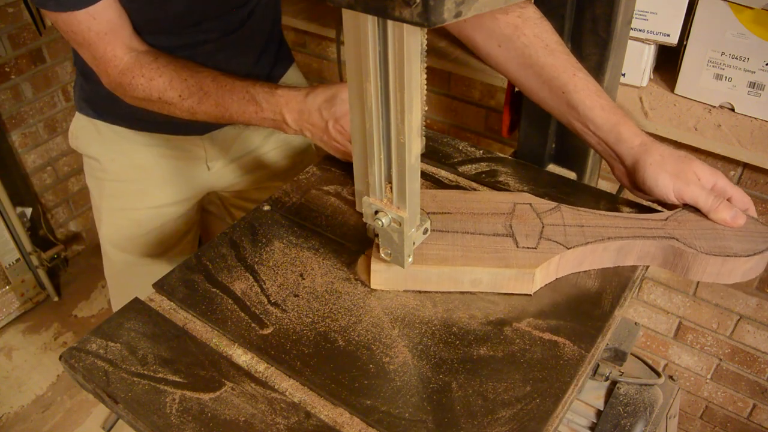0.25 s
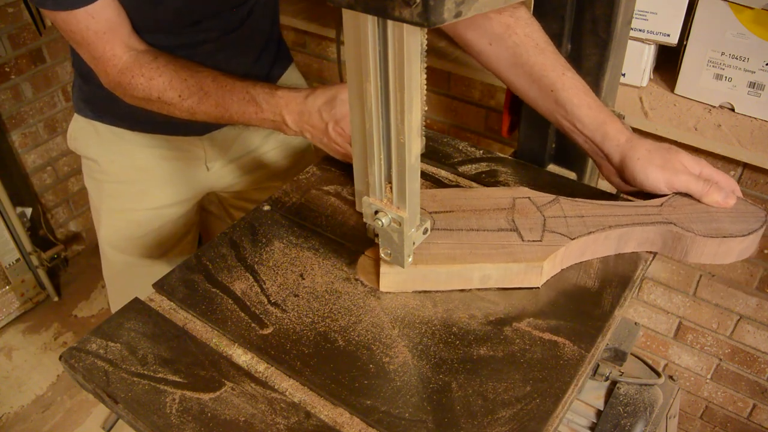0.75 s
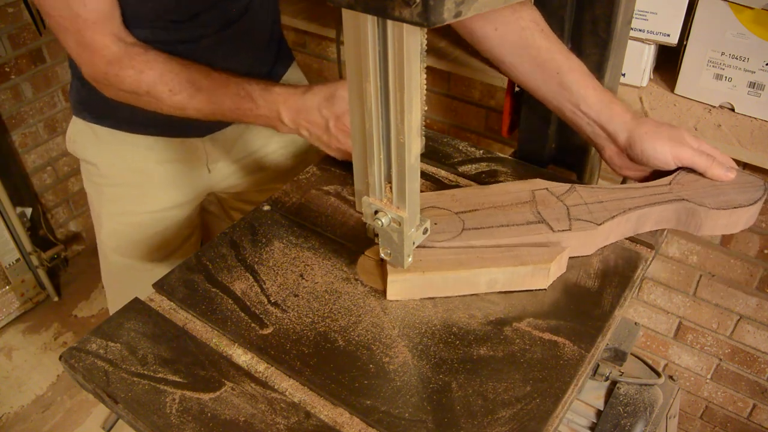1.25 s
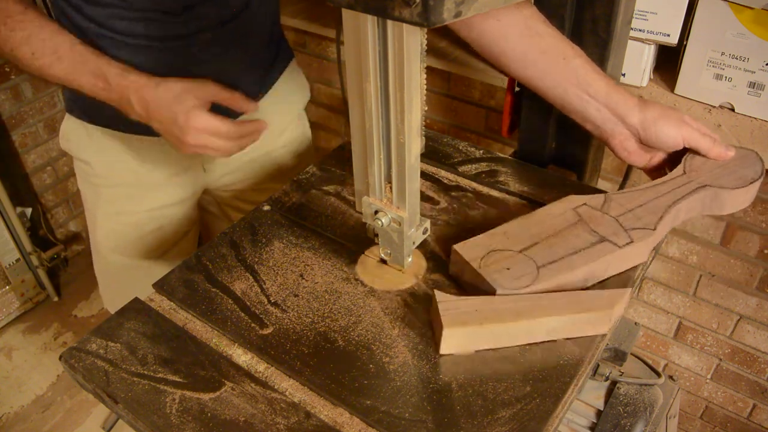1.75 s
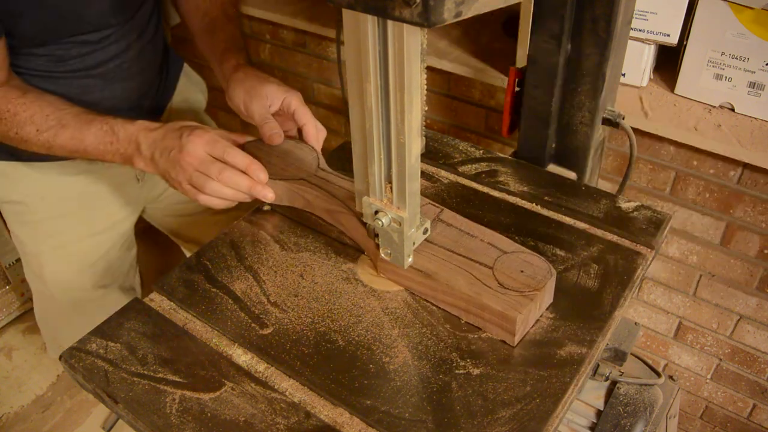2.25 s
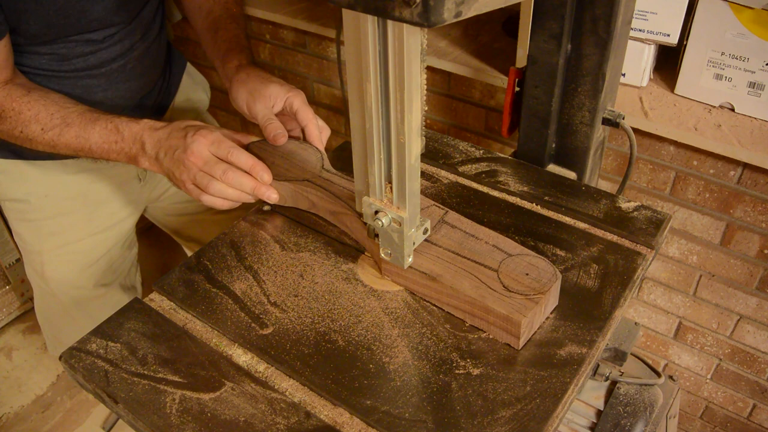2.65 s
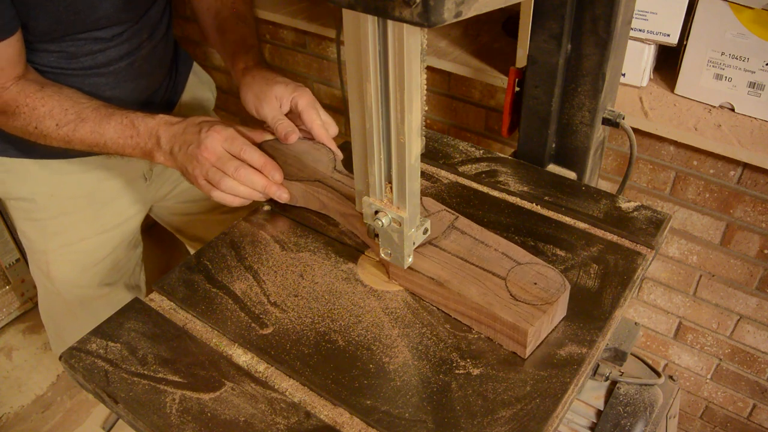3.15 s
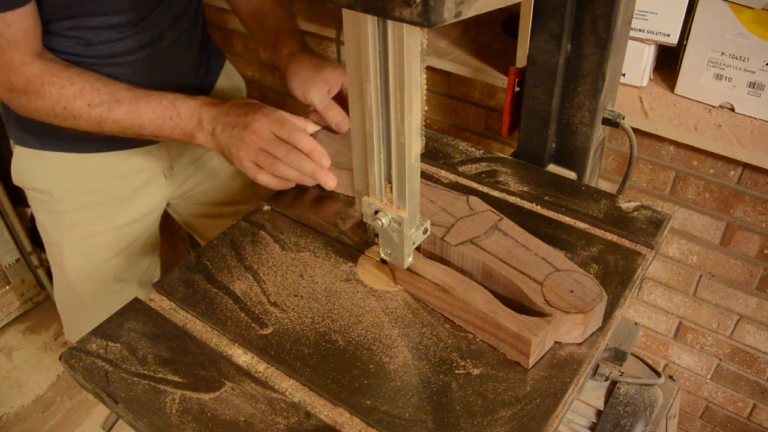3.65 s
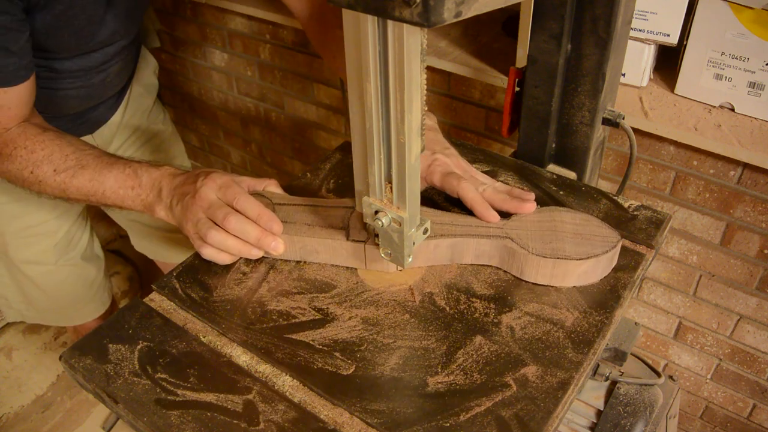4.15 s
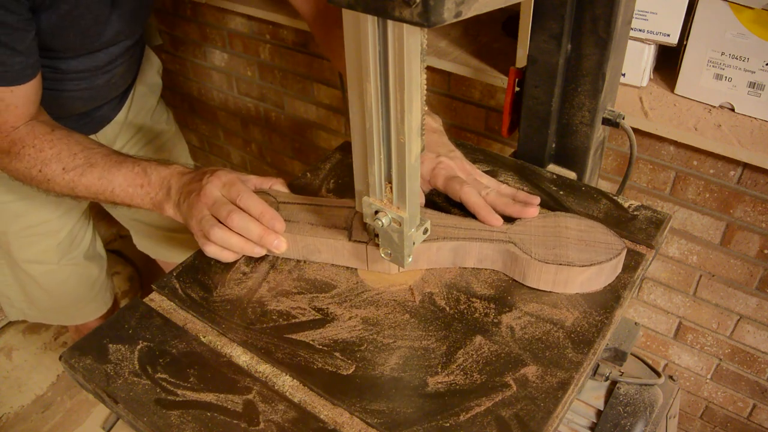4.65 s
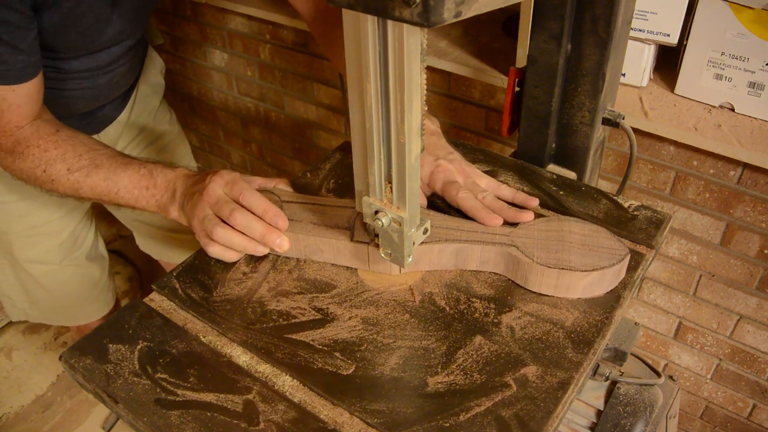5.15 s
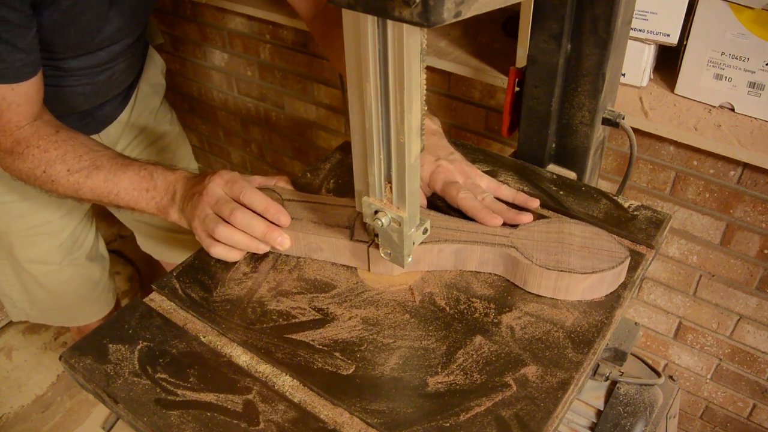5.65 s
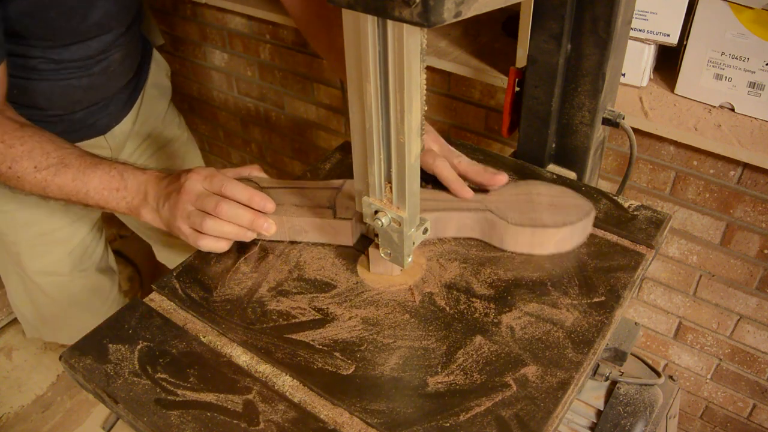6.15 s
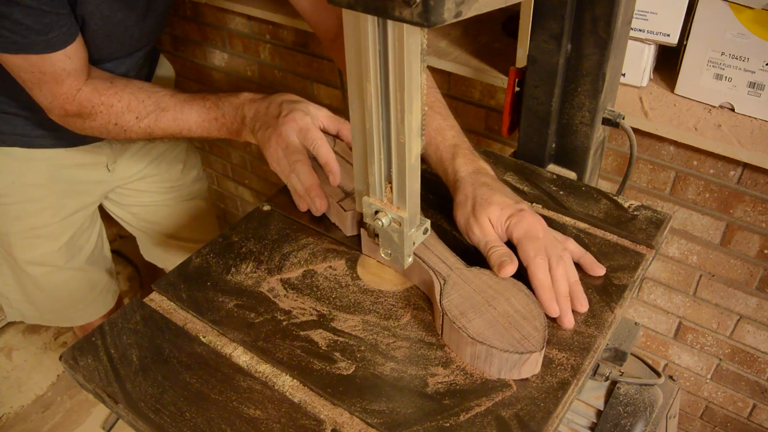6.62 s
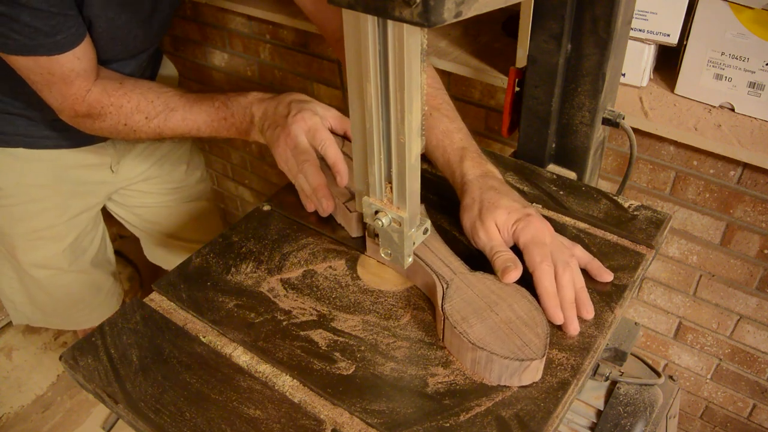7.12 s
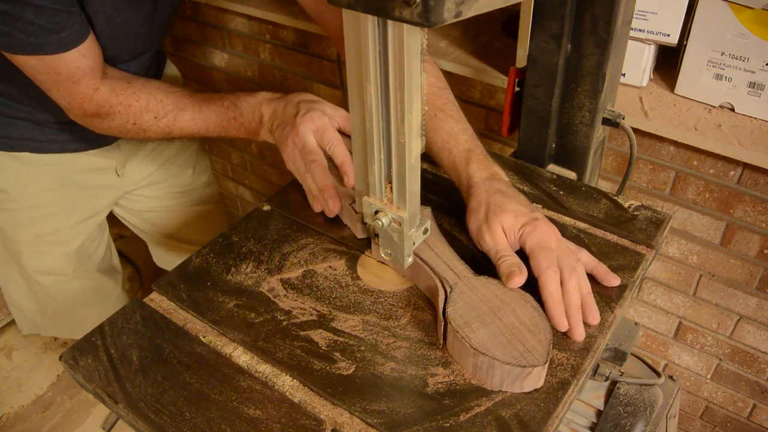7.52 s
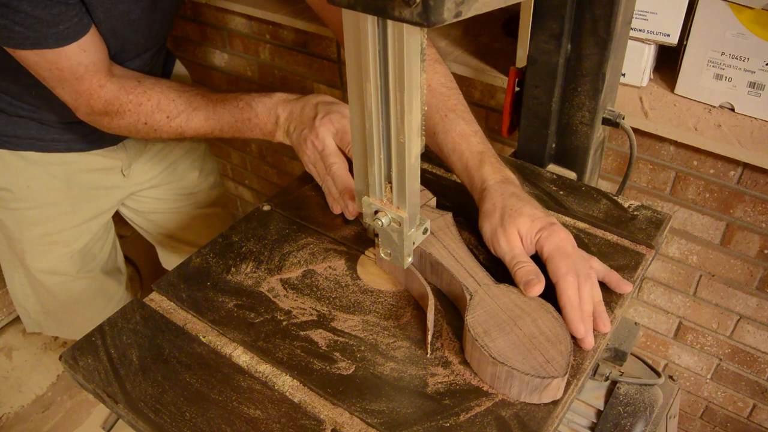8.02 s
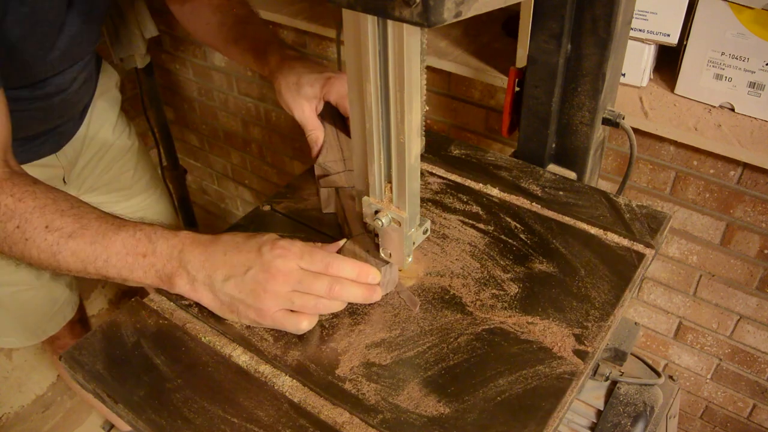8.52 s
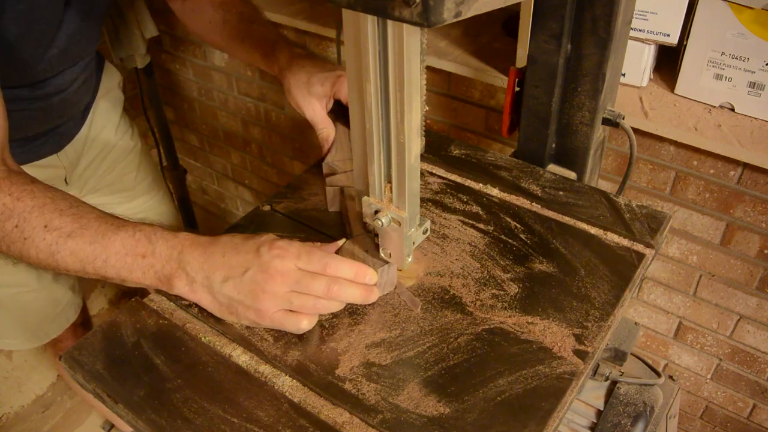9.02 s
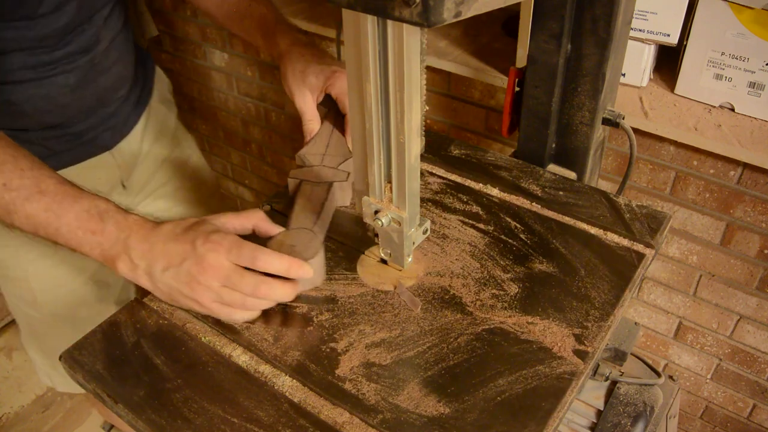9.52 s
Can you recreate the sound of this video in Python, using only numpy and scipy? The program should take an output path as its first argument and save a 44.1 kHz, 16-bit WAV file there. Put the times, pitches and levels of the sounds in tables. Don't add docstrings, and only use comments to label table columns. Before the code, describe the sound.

Steady bandsaw roar and whine, with harsh gritty wood cutting, rough squeals and small knocks, broken by abrupt jumps between successive cuts.

```python
import sys
import numpy as np
from scipy import signal
from scipy.fft import rfft, irfft, next_fast_len
from scipy.io import wavfile
from scipy.ndimage import uniform_filter1d, map_coordinates

SR = 44100
rng = np.random.default_rng(int(sys.argv[2]) if len(sys.argv) > 2 else 0)


def bounce(signal):
    frames = np.transpose(np.atleast_2d(signal))
    limited = np.clip(frames, -1, 1)
    pcm = np.round(limited * 32767).astype(np.int16)
    wavfile.write(sys.argv[1], SR, pcm)


def boost(x):
    u = np.asarray(x, float) / 20
    return 10 ** u


N = 431298

# shot start [s], blade leaves the wood [s], gain held down [dB], rasp [dB], tooth tone [dB]
CUTS = [
    (0, 0.914, -8, -20.5, -38),
    (1.885, 3.293, -6, -20, -39),
    (3.854, 5.485, -9.5, -19, -32.5),
    (6.524, 7.8, -8, -20, -34.5),
    (8.459, 8.834, -4, -20, -45),
]
EXIT_S = 0.06


def unit(x):
    return x / np.sqrt(np.mean(x ** 2) + 1e-20)


def along(points, hz):
    f, v = np.transpose(points)
    return np.interp(np.log(hz + 1), np.log(f + 1), v)


def wobble(rate_hz):
    coarse = np.arange(0, N + 32, 32)
    knots = rng.standard_normal(int(N * 400 / SR))
    curve = map_coordinates(knots, [coarse * np.clip(rate_hz, .1, 390) / SR])
    return np.interp(np.arange(N), coarse, curve)


def bumps(rows):
    t = np.arange(0, N + 32, 32) / SR
    curve_db = sum(db * np.exp(-((t - s) / half_s) ** 2) for s, half_s, db in rows)
    return np.interp(np.arange(N) / SR, t, curve_db)


def gate(start_s, length_s, rise_s, fall_s):
    t = np.arange(N) / SR - start_s
    return np.clip(np.minimum((t + 0.0061) / rise_s, (length_s - t) / fall_s), 0, 1)


def shots():
    start_s, exit_s, held_db = np.transpose(CUTS)[:3]
    t = np.arange(N) / SR
    k = np.clip(np.searchsorted(start_s, t, side="right") - 1, 0, None)
    load = np.clip((exit_s[k] - t) / EXIT_S + .5, 0, 1)
    return held_db[k], t - exit_s[k], load


def filtered(x, response):
    m = next_fast_len(x.shape[-1] + 8192)
    spectrum = rfft(x, m) * response(np.fft.rfftfreq(m, 1 / SR))
    return irfft(spectrum, m)[..., :x.shape[-1]]


def body(modes, spectrum=((20, -120),), valley_db=-8.0, top_hz=9600):
    def response(f):
        peaks = sum(boost(2 * db) / (1 + (2 * (f - hz) / width_hz) ** 2) ** 1.93 for hz, width_hz, db in modes)
        power = peaks + boost(2 * (along(spectrum, f) + valley_db))
        return np.sqrt(power) * (f < top_hz), peaks / power
    return response


def rush(response, patchy_db, size=N):
    # frequency [Hz], likeness [0-1]
    alike = [(60, 0.67), (110, 1), (210, 0.97), (390, 1), (730, 0.89), (1370, 0.93), (2550, 0.7),
             (4760, 0.69), (8900, 0.42)]
    z = signal.stft(rng.standard_normal((2, size + 512)), nperseg=512)[2]
    field = uniform_filter1d(rng.standard_normal(z.shape[1:]), 3, axis=0)
    field = uniform_filter1d(field, 9, axis=1)
    pair = signal.istft(z * boost(patchy_db * unit(field)), nperseg=512)[1][:, :size]

    def spread(hz):
        gain, direct = response(hz)
        turn = np.arccos(np.clip(along(alike, hz), .05, 1) ** (1.6 - 1.33 * direct)) / 2
        return gain * [np.cos(turn), np.sin(turn)]
    mid, side = filtered(pair, spread)
    return unit(np.array([mid + side, mid - side]))


def even(x, seconds):
    power = uniform_filter1d(np.mean(x ** 2, axis=0), round(seconds * SR))
    return x / np.sqrt(np.abs(power) + .05)


def sing(hz, width_hz, clean):
    turn = 2 * np.pi * np.cumsum(hz + np.zeros(N)) / SR
    return unit((clean + wobble(width_hz)) * np.sin(turn) + wobble(width_hz) * np.cos(turn))


def saw():
    # frequency [Hz], width [Hz], level [dB]
    frame = [(650, 6.3, -15), (888, 89, -7), (1124.6, 38, -3), (1405, 57, -0.5), (1832, 54, -1),
             (2093, 180, -4.5), (2506, 60, -2), (3110, 170, -0.5), (3480, 56, -29), (3960, 150, -7.5),
             (4530, 140, -14), (4700, 85, -30), (5680, 60, -3), (5875, 140, 1.5), (6700, 230, -9.5),
             (7520, 85, -15), (8320, 130, -14.5), (8614, 180, -14.5)]
    # frequency [Hz], width [Hz], level [dB]
    covers = [
        (7070, 360, -13),
        (7920, 250, -23.5),
        (5450, 86, -11),
    ]
    # frequency [Hz], density [dB per Hz]
    roar_spectrum = [(120, -29.5), (200, -11), (464, -13), (535, -5), (618, -8), (1200, -6.5), (1390, -5),
                     (1630, -8.5), (3120, -3.5), (4360, -15), (5980, -5.5), (8000, -20), (8900, -30.5),
                     (11600, -98.5), (19600, -120)]
    # frequency [Hz], width [Hz], level over the frame [dB]
    motor = [(688, 12, -13), (930, 22, -13), (1366, 30, -11), (1407, 22, -4), (1510, 26, -11)]
    # frequency [Hz], width [Hz], level [dB]
    guides = [
        (5945, 31, 3),
        (6057, 290, -8),
        (5270, 40, -18),
    ]
    # time [s], half length [s], change [dB]
    stumble = (3.56, 0.039, -2.5)
    frame_idle_db, whine_idle_db, motor_freed_db = -27, -28, 4.5
    whine_loaded = 0.94
    hold_s, recover_s = 0.022, 0.074

    held_db, since_s, load = shots()
    gain_db = held_db * np.exp(-np.maximum(since_s - hold_s, 0) / recover_s)
    duck_db = bumps([stumble])
    frame_db = frame_idle_db + gain_db + duck_db
    whine_db = whine_idle_db + gain_db * (1 - whine_loaded * load) + duck_db + 1.5 * wobble(2.5)
    flutter_db = 0.42 * wobble(12) + 0.71 * wobble(35)
    frame_noise = rush(body(frame + covers, roar_spectrum, valley_db=-4.5), patchy_db=1.5)
    roar = boost(frame_db + 8.0 + flutter_db) * frame_noise
    hum_db = frame_db - 4.5 + motor_freed_db * (1 - load)
    hum = boost(hum_db) * sum(boost(db) * sing(hz, width_hz, clean=1.1) for hz, width_hz, db in motor)
    whine = boost(whine_db + 2.5) * even(rush(body(guides), patchy_db=2.0), 0.074)
    return roar + hum + whine


def cutting():
    # frequency [Hz], width [Hz], level [dB]
    boards = [
        [(1130, 66, -7.5), (1546, 49, -3.5), (1955, 4.3, 5), (2174, 61, -5.5), (2640, 50, -3.5),
         (3070, 140, -9), (3710, 66, -5.5)],
        [(903, 35, -3.5), (2145, 110, 2), (2510, 100, -1.5), (2693, 61, 0.5), (3110, 310, -2.5), (3620, 36, 2)],
        [(1280, 220, -10.5), (2006, 11, 4), (2173, 140, 0.5), (2525, 190, -1.5), (3156, 230, -3),
         (3660, 110, -4.5)],
        [(1150, 70, -23), (1906, 38, -9), (2160, 120, -9), (2515, 110, -9.5), (3100, 180, -17.5), (3630, 49, 1),
         (4440, 73, -14)],
        [(1390, 61, -3.5), (2100, 220, -4), (2425, 83, 0), (2686, 33, 3.5)],
    ]
    # frequency [Hz], width [Hz], level [dB]
    blades = [
        [(6000, 71, -19), (6570, 84, -11.5), (7735, 17, -5)],
        [(5990, 19, 4.5), (6720, 63, -19.5), (8400, 92, -17.5)],
        [(5890, 330, -2), (6420, 220, -5.5), (6840, 230, -6.5), (8610, 160, -16.5)],
        [(5900, 120, -3.5), (6800, 73, -8.5), (7630, 77, -12.5)],
        [(5880, 51, 6), (5910, 56, -2.5), (8570, 40, -6.5)],
    ]
    hiss_db = [-7.5, -5, -6.5, -8.5, -6.5]
    # frequency [Hz], density [dB per Hz]
    rasp = [(120, -61), (200, -13), (300, -21.5), (440, -16), (640, -8.5), (727, -12.5), (1250, -8),
            (1660, -10), (2000, -4.5), (3410, -4), (3630, 1), (4990, -12), (6040, -7), (8300, -13),
            (9000, -16), (11700, -67), (19800, -120)]
    # frequency [Hz], density [dB per Hz]
    sizzle_spectrum = [(9300, -120), (9600, -16), (11000, -12.5), (13000, -17.5), (13400, -18), (13800, 2),
                       (14900, 1.5), (15200, -50.5)]
    # multiple of the tooth rate, level [dB]
    teeth_partials = [(1, 0.5), (2, -13.5), (3, -2), (4, -8), (5, -1.5), (12, -15)]
    # time [s], half length [s], change of rasp [dB]
    feed = [(.52, 0.014, -3.5), (.7, 0.14, 0.1), (.87, 0.03, -1), (1.985, 0.049, -4.5), (2.69, .05, 1),
            (3.2, 0.061, 1.9), (4.19, 0.048, -2.5), (4.35, .03, -1), (4.62, 0.025, -1.5),
            (5.21, 0.025, 1.5), (5.27, 0.051, -3.5), (5.4, 0.14, -1.35), (6.78, 0.042, 0.5),
            (7.05, 0.5, -0.67), (7.63, 0.049, -1), (8.495, 0.062, -5)]
    tooth_hz = 646
    teeth_follow = 3.7

    out = np.zeros((2, N))
    turn = 2 * np.pi * np.cumsum(tooth_hz * (1 + 0.00272 * wobble(25))) / SR
    tone = sum(boost(db + 3.6 * wobble(9)) * np.sin(int(k) * turn) for k, db in teeth_partials)
    tone = np.sqrt(2) * tone
    sizzle = rush(body([], sizzle_spectrum, top_hz=15100), patchy_db=-2.0)
    chatter_db = 0.6 * wobble(14) + 1.13 * wobble(40)
    feed_db, load = bumps(feed), shots()[2]
    for (start_s, exit_s, _, rasp_db, tooth_db), board, blade, valley_db in zip(CUTS, boards, blades, hiss_db):
        a, b = round(start_s * SR), round((exit_s + EXIT_S) * SR)
        chips = rush(body(board + blade, rasp, valley_db=valley_db), patchy_db=1.0, size=b - a)
        chips = chips + boost(-49.5) * sizzle[:, a:b]
        teeth = boost(tooth_db + teeth_follow * feed_db[a:b]) * tone[a:b]
        out[:, a:b] += load[a:b] * (boost(rasp_db + feed_db[a:b] + chatter_db[a:b]) * chips + teeth)
    return out + boost(-77.5) * sizzle


def squeals():
    # start [s], length [s], frequency [Hz], noise width [Hz], level [dB]
    tones = [(0, .52, 1620, 55, -28), (0, .5, 1932, 14, -33.5), (0, .88, 3700, 110, -30),
             (.04, .2, 2720, 50, -31), (.66, .2, 1630, 55, -29.5), (.86, .06, 4500, 120, -32),
             (3.08, .2, 3890, 90, -31), (3.24, .06, 2580, 40, -27), (3.93, .23, 1885, 24, -30),
             (4.3, .32, 1890, 24, -32), (4.64, .24, 1880, 24, -27.5), (4.95, .22, 1875, 24, -26.5),
             (5.165, .09, 2530, 30, -23.5), (5.27, .22, 2548, 18, -24.5), (6.525, 1.06, 3595, 85, -25.5),
             (6.53, .2, 4370, 380, -28), (6.6, 1.15, 2150, 50, -33), (6.76, .3, 4300, 380, -29),
             (6.92, .18, 4000, 200, -28), (6.9, .3, 1935, 30, -32), (7.1, .5, 4400, 380, -32),
             (7.55, .24, 3620, 110, -32), (8.46, .38, 2155, 90, -27.5), (8.462, .09, 2185, 120, -25)]
    edge_s, clean_hz = 0.017, 34.2
    out = np.zeros(N)
    for start_s, length_s, hz, width_hz, db in tones:
        level = gate(start_s, length_s, edge_s, edge_s) * boost(db + 0.6 * wobble(15))
        out += level * sing(hz, width_hz, clean_hz / width_hz)
    return out


def groans():
    # start [s], length [s], frequency [Hz], level [dB]
    loaded = [(0, 0.17, 249, -42), (0.51, .5, 250, -28), (.95, 0.36, 251.6, -39), (1.877, 0.63, 250.5, -28),
              (3.064, 0.19, 248, -39.5), (3.453, .13, 223.5, -33), (3.95, 0.54, 249, -42.5),
              (4.51, 0.66, 249, -47), (6.53, .4, 255.5, -42.5), (6.9, 0.42, 256.2, -35.5),
              (7.166, 0.42, 255.3, -34.5), (7.424, 0.32, 253, -34), (8.556, 0.18, 246, -40.5)]
    rise_s, fall_s, fade_db_per_s = 0.023, 0.078, 16
    freed_hz, settled_hz, sag_s = 266, 213.7, .3
    freed_db, freed_fade_db_per_s, freed_wait_s = -34.5, 12.5, .08

    t, out = np.arange(N) / SR, np.zeros(N)
    shot_starts_s = np.transpose(CUTS)[0]
    for start_s, length_s, hz, db in loaded:
        fade_db = fade_db_per_s * np.maximum(t - start_s, 0)
        attack_s = rise_s * (start_s not in shot_starts_s) + .002
        level = gate(start_s, length_s, attack_s, fall_s) * boost(db - fade_db)
        out += level * sing(hz, 18, clean=1.8)
    since_s = np.maximum(shots()[1], 0)
    sag_hz = settled_hz + (freed_hz - settled_hz) * np.exp(-since_s / sag_s)
    freed = np.clip((since_s - freed_wait_s) / .07, 0, 1) * boost(freed_db - freed_fade_db_per_s * since_s)
    out += freed * sing(sag_hz, 36, clean=0.51)
    return out * boost([[.3], [-.3]])


def door():
    # time [s], half length [s], rise [dB]
    rattles = [(.02, 0.042, 7), (.5, .07, 5), (.9, 0.071, 8.5), (1.45, 0.28, 7.5), (1.78, .06, 7.5),
               (2.25, 0.29, 9), (3.04, .08, 6.5), (3.8, .08, 8), (4.8, .25, 4.5), (5.53, 0.077, 3),
               (6.22, 0.14, 9.5), (6.72, 0.059, 10), (7.52, 0.093, 10), (8.35, 0.033, 5.5), (9.3, 0.51, 3)]
    door_db = -39.5 + bumps(rattles) + 1.5 * wobble(22)
    panel = body([(541.7, 30, 0.5), (505, 110, -14.0)])
    return boost(door_db) * even(rush(panel, patchy_db=4.5), .06)


def knocks():
    # time [s], scrape [dB], note [dB], note frequency [Hz], t60 [s]
    shifts = [(.889, -8, -19, 556, .11), (1.563, -30, -14, 1235, .1), (1.889, -8, -20, 1002, 0.15),
              (1.926, -6.5, -15.5, 634, 0.13), (2.139, -16.5, -19, 505, 0.24),
              (2.192, -18, -18.5, 502, 0.17), (7.452, -10.5, -21, 1110, 0.12),
              (7.483, -8.5, -13.5, 1130, .08), (7.518, -8.5, -14, 1158, 0.13),
              (8.329, -21.5, -19.5, 532, 0.098), (8.452, -1.5, -7, 558, .03), (8.453, -9, -8.5, 1054, .025)]
    out, t = np.zeros(N + SR), np.arange(SR // 8) / SR
    for s, scrape_db, note_db, hz, t60_s in shifts:
        fall = boost(-60 * t / t60_s) * (1 - np.exp(-t / 0.0025))
        note = boost(note_db) * np.sin(2 * np.pi * hz * t)
        scrape = boost(scrape_db) * rng.standard_normal(len(t))
        out[round(s * SR):][:len(t)] += fall * (note + scrape)
    return filtered(out[:N], lambda hz: 1 / (1 + (hz / 3000) ** 2) / (1 + (hz / 5500) ** 12))


def scene():
    return saw() + cutting() + squeals() + groans() + door() + knocks()


def band_limit(x):
    return signal.sosfilt(signal.butter(12, 15100, fs=SR, output="sos"), x)


def record(dry):
    # frequency [Hz], left minus right [dB]
    lean = [(60, -6), (100, 1.5), (180, 0), (320, 1), (550, 0.0), (960, 0.0), (1680, -0.5), (2930, -4),
            (5110, 0.5), (8900, 0.5)]
    # frequency [Hz], lead of the left port [radians]
    lead = [(0, 1), (2840, -0.62), (3960, 1), (5510, -0.74), (5770, -0.8), (6720, -0.56), (7150, -1.5),
            (7920, 0.23), (8270, -1.7), (9040, 0.072)]
    # time [s], thump [dB], tick [dB]
    changes = [
        (1.886, -29.5, -72),
        (3.854, -11, -16.5),
        (6.5253, -10.5, -26.5),
        (8.4596, -16, -23),
    ]
    half = np.array([[.5], [-.5]])

    def response(hz):
        low_cut = 1 / np.sqrt(1 + (205 / (hz + 1)) ** 14)
        gap = np.maximum(1 / np.sqrt(1 + (hz / 9050) ** 60), hz > 9600)
        ports = boost(along(lean, hz) * half) * np.exp(1j * along(lead, hz) * half)
        return low_cut * gap * ports
    x = filtered(dry, response)
    bass = filtered(x.mean(axis=0), lambda hz: hz < 1500)
    x += boost(-6.0) * filtered(bass ** 2, lambda hz: hz / (hz + 60) / (1 + (hz / 200) ** 6))
    t = np.arange(64)
    for s, thump_db, tick_db in changes:
        x[:, round(s * SR):][:, :64] += boost(thump_db) * np.exp(-t / 6) + boost(tick_db) * (-.3) ** t
    return band_limit(x)


dry = scene()
out = record(dry)
bounce(out)
```